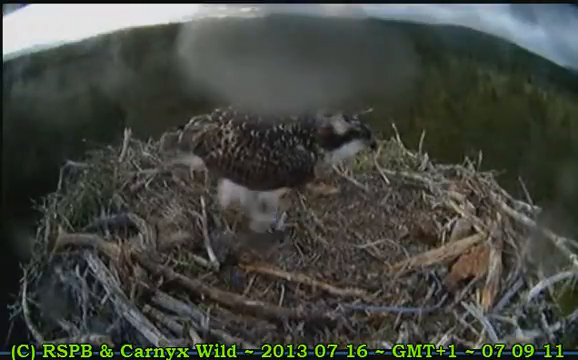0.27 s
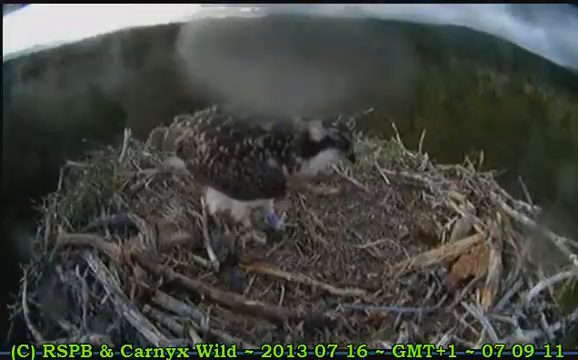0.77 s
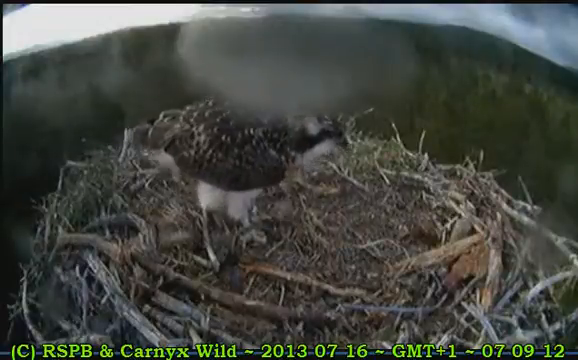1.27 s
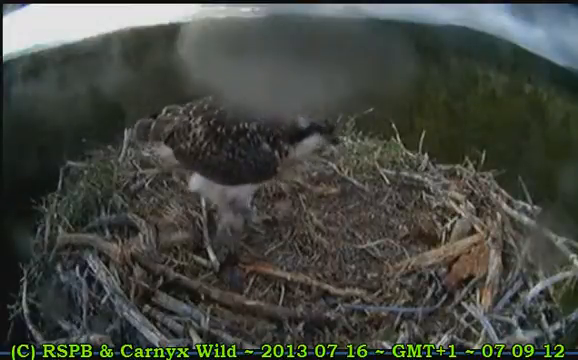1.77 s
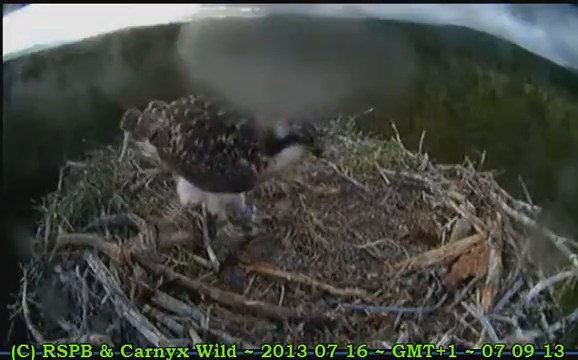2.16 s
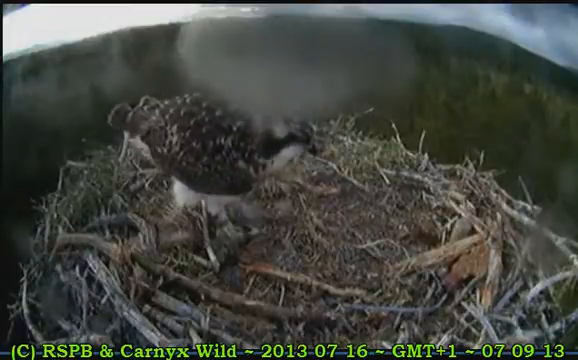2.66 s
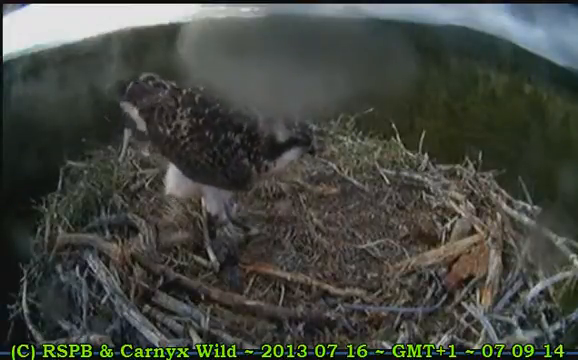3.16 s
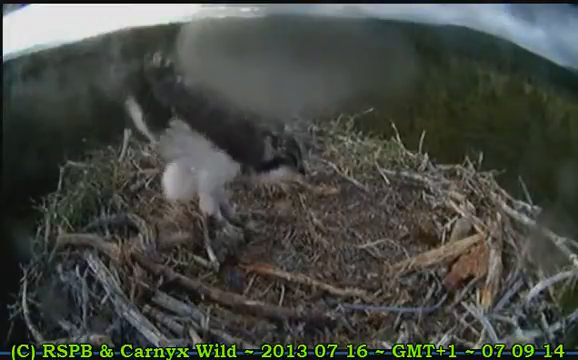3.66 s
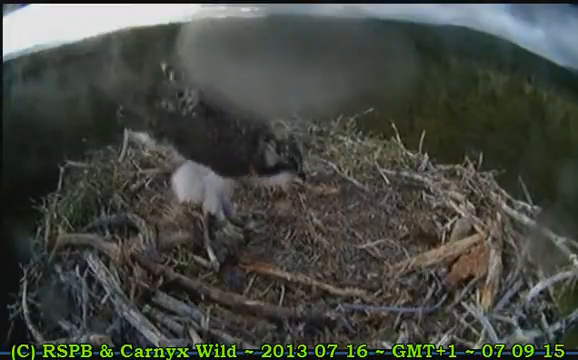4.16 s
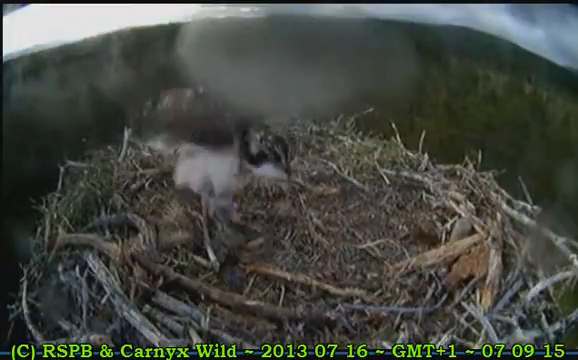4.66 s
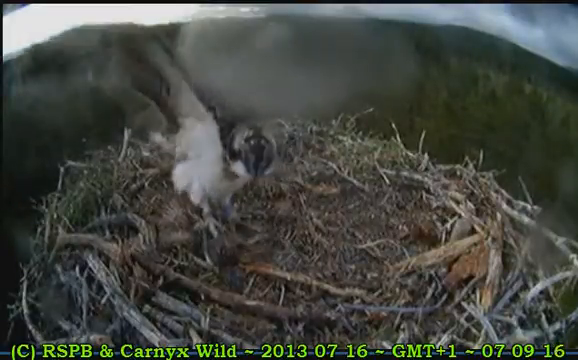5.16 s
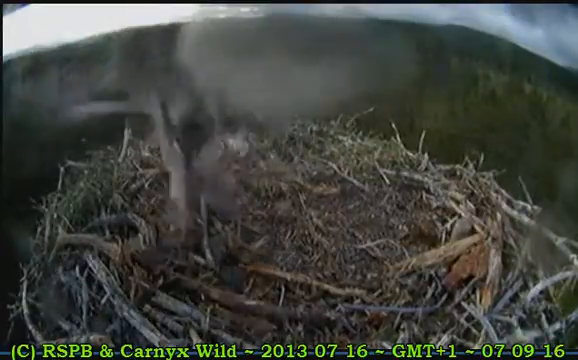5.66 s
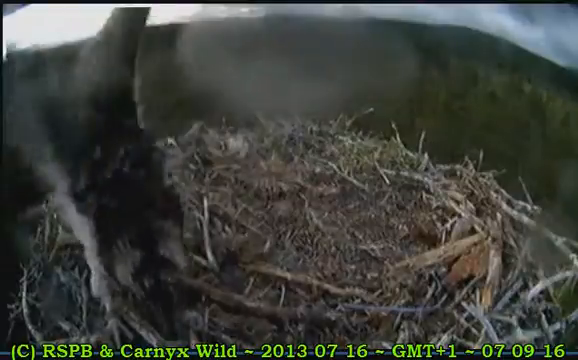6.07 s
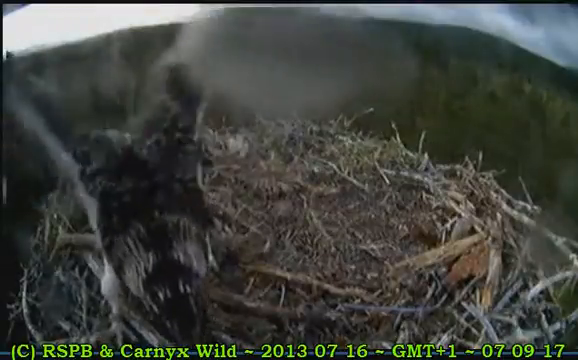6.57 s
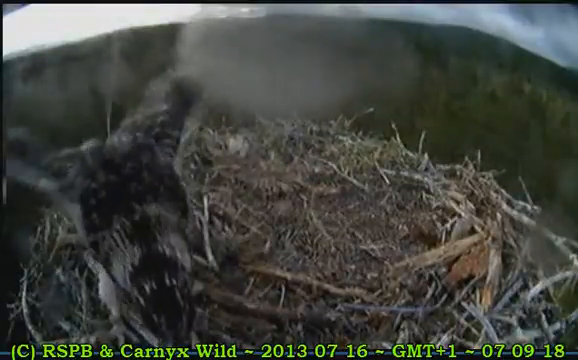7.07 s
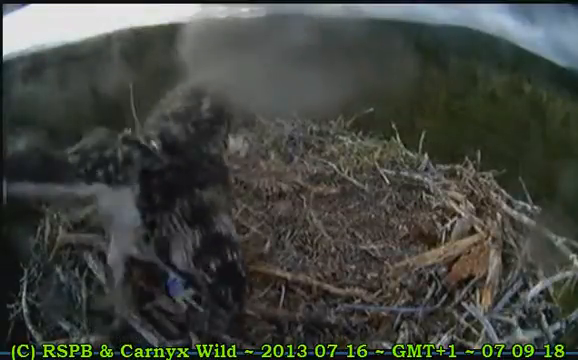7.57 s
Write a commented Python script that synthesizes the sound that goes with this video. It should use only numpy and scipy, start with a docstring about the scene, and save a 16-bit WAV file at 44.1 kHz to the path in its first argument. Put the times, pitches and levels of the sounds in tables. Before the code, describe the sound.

A young osprey shuffles and flaps on a stick nest amid buzzing mains hum and hiss, then gives one sharp, distorted, descending call.

```python
"""One loud, falling osprey call, a whistle with overtones and scattered breath, overloads both inputs. The
young bird sits on a stick nest: noise scrapes and sharp pushes ring resonances as rustles, snaps and thuds. A
faint rising tone follows the call, over gusting wind made of shaped stereo noise and over amplifier hiss. The
two microphone lines of an outdoor camera pick up mains hum, picture buzz and whistles, built from steady tones
that slip in time about twice a second."""
import sys
import numpy as np
from scipy import signal
from scipy.fft import rfft, irfft
from scipy.io import wavfile
from scipy.ndimage import uniform_filter1d, map_coordinates

SR = 44100
rng = np.random.default_rng(int(sys.argv[2]) if len(sys.argv) > 2 else 0)


def log_audio(samples):
    """Write samples as a 16-bit WAV file to the path given in sys.argv[1]."""
    # one column per channel
    frames = np.atleast_2d(samples).T
    # limit to full scale, then quantise
    limited = np.clip(frames, -1, 1)
    pcm = np.round(limited * 32767).astype(np.int16)
    wavfile.write(sys.argv[1], SR, pcm)


N = 344845
T = np.arange(N) / SR
CLOCK = np.arange(N + SR // 20) / SR  # runs on a little, so that the slips have something to skip to
SIDES = np.array([[.5], [-.5]])  # splits a left-minus-right difference over the two channels

# amplifier hiss colour: (frequency [Hz], relative density [dB per Hz])
HISS_COLOUR = [(600, 1.5), (1500, 1), (3000, 2), (6500, 3.5), (7350, 2.5), (7600, 6.5), (8300, 9),
               (8600, -26.5), (9700, -3), (10100, -15.5), (12200, -9.5), (14500, -6.5), (15700, -18)]
# likeness of the hiss on the two lines: (frequency [Hz], likeness [0-1])
HISS_ALIKE = [(1000, 0.89), (3000, 0.96), (7000, 0.95), (8000, 1.0), (9800, 1.0), (10300, 0.098)]
# phase lead of the left hiss: (frequency [Hz], lead [half turns])
HISS_LEAD = [(10000, 0), (10300, 1)]
# change in the hiss above 10 kHz: (time [s], level [dB])
HISS_TREBLE = [(0, -1), (5.8, -2), (6.1, 0), (7.2, 0.5), (7.5, 3), (7.82, 1)]
HISS_DB = -50
PATCHY_DB, PATCHY_PER_S = 2, 13.0  # each narrow band of the hiss flickers on its own

# mains hum: (multiple, left level [dB], right level [dB], left lead [rad])
MAINS_LINES = [(1, -44.5, -47.5, 1.87), (2, -88, -72, 3.9), (3, -40, -42.5, 0.92), (5, -45, -44, 1.12),
               (7, -56.5, -52, 0.54), (9, -67.5, -61, 0.64)]
# buzz of the picture fields: (multiple, left level [dB], right level [dB], left lead [rad])
FIELD_LINES = [(1, -58, -62, 2.5), (2, -53.5, -49, 1.7), (3, -50.5, -48, 1.26), (4, -58.5, -54.5, -2),
               (5, -56.5, -53, 0.53), (6, -64, -66, 0.5), (7, -58, -60.5, 0.97), (8, -56, -60, 0.45),
               (9, -66, -62.5, 0.86), (12, -63, -65.5, 4.5)]
# upper buzz lines, each moved to the nearest field multiple: (frequency [Hz], level [dB])
SPIKE_LINES = [(748.3, -76), (796.7, -67.5), (899.0, -65.5), (947.5, -70), (995.9, -68.5), (1044, -69.5),
               (1096, -76), (1146, -76), (1196, -76), (1296, -75), (1394, -69.5), (1497, -66), (1593, -74),
               (1642, -67.5), (1744, -69.5), (1994, -75), (2143, -69.5), (2245, -70.5), (2342, -73),
               (2492, -80), (2789, -69), (2939, -73), (3138, -72.5), (3240, -77), (3338, -76), (3738, -73),
               (3989, -73), (4086, -72), (4587, -71), (5184, -71)]
# whistles from the picture scan: (frequency [Hz], level [dB], share lost during blanking [0-1])
SCAN_WHISTLES = [(7975.08, -41.8, .85), (7838.0, -65, 0), (7738.3, -62, .3), (7688.4, -67, 0),
                 (5383.1, -59.5, .6), (2592.0, -62, .6)]
MAINS_HZ, FIELD_HZ = 49.803, 49.844
BLANK_S, SPIKE_S, CREST_S = .0119, .0188, -.0008  # time offsets of blanking, spike and mains crest
# stream samples skipped at each slip: one column (skip [samples])
SLIP_SAMPLES = [53, 52, 52, 52, 52, 53, 53, 52, 52, 52, 51, 51, 51, 54, 52]
SLIP_FIRST_S, SLIP_EVERY_S, STREAM_HZ = .49, .4985, 32000

# wind colour: (frequency [Hz], relative density [dB per Hz])
WIND_COLOUR = [(15, -23), (35, -14), (70, -9.5), (125, -6.5), (200, -4), (300, -8), (420, -10),
               (600, -14.5), (850, -20.5), (1500, -27), (2500, -45), (4000, -87)]
# likeness of the wind at the two microphones: (frequency [Hz], likeness [0-1])
WIND_LIKENESS = [(35, .4), (75, 0.2), (125, 0.8), (250, 0.36), (600, 0.93), (1200, 0.68)]
# phase lead of the left wind: (frequency [Hz], lead [rad])
WIND_PHASE = [(40, 3.0), (75, 2.9), (125, 2.2), (250, 1.9), (600, 2.45), (850, 2.3), (1200, 1.9),
              (2000, 1.2)]
# stereo balance of the wind: (frequency [Hz], left minus right [dB])
WIND_SIDES = [(40, -11), (75, 7.5), (125, 14.5), (200, 2.5), (300, 0.5), (500, -3.5), (1200, 0)]
# gusts, as the deep rumble before it flutters: (time [s], level [dB])
GUST_LEVEL = [(0, -51), (1.3, -48.5), (1.7, -52), (2.85, -52), (3.2, -48), (3.7, -52), (4.1, -55), (5, -53),
              (6.2, -51), (6.55, -57), (7.2, -55), (7.82, -55)]

# resonances of the rustling sticks: (frequency [Hz], width [Hz], relative level [dB])
STICK_MODES = [(1070, 390, 17.5), (1330, 670, 18), (2110, 930, 20.5), (2820, 440, -32.5)]
# resonances of the feathers: (frequency [Hz], width [Hz], relative level [dB])
FEATHER_MODES = [(3930, 740, 35), (4900, 900, -23), (6300, 1500, -37)]
# strokes of wings and feet: (peak [s], level [dB], swell [s], fade [s], feathers over sticks [dB])
NEST_STROKES = [(5.745, -41.5, 0.057, 0.044, -11), (5.785, -38, 0.051, 0.041, -5.5),
                (5.99, -45, 0.071, 0.023, -7), (6.025, -43, 0.047, 0.05, -2), (6.062, -44, 0.04, 0.025, 0),
                (6.3, -53.5, 0.49, 0.036, -7), (6.575, -53, 0.21, 0.051, 0), (6.78, -53, .02, 0.085, -4),
                (7.09, -53.5, 0.22, 0.2, -4.5), (7.285, -57, 0.014, 0.19, 3), (7.46, -49, 0.29, 0.1, -13),
                (7.62, -47, .1, 0.06, -5), (7.735, -53, 0.028, 0.1, -20)]
STROKE_DROP_DB, STROKE_BEND = 32, 2  # drop over one swell or fade, and its curvature
STROKE_PAN_DB, LUMPY_DB = -2.5, 1.5  # left minus right, and uneven level, of the whole rustle
SHUFFLE_FROM_S, SHUFFLE_DB = 5.1, -60  # light shuffling under the strokes

# modes of the heavy nest body: (frequency [Hz], width [Hz], relative level [dB])
NEST_MODES = [(100, 60, -15), (153, 110, 9), (222, 160, -8)]
# thuds of feet and wings, before the housing: (start [s], peak [dB], strongest [Hz], t60 of the push [s])
NEST_THUDS = [(5.75, -29.5, 214, 0.19), (5.99, -32, 99, 0.083), (7.568, -28.5, 150, 0.095)]
# modes of a thin twig: (frequency [Hz], width [Hz], relative level [dB])
TWIG_MODES = [(1440, 360, 10), (2230, 480, 7.5), (2750, 450, -7), (4680, 1100, -10)]
# snaps, before bass cut and housing: (start [s], peak [dB], brightest [Hz], left minus right [dB])
TWIG_SNAPS = [(3.566, -22, 1850, -6.5), (5.7277, -37, 1500, -2.5), (5.766, -27, 1200, -2.5),
              (5.783, -35, 2000, -2.5), (5.787, -28, 1400, -4), (5.846, -36, 1640, -5),
              (5.92, -33, 1410, -5), (5.939, -30, 1930, -2), (5.9787, -23.5, 2300, -5),
              (6.019, -35, 1500, -2.5), (6.028, -35, 1600, -2.5), (6.036, -35, 2200, -2.5),
              (6.0478, -24.5, 3000, -6), (6.13, -29, 2600, 0), (6.477, -35, 1480, -2),
              (6.562, -33, 3500, -2), (7.02, -36, 1600, -2), (7.077, -39, 3000, -2)]
SNAP_T60_S, SNAP_CRACK = 0.018, 16  # fade of the splintering; size of the first break over it
SECOND_CRACK_S, SECOND_CRACK = .0012, .6  # the twig breaks through later: delay, share of the first break

# faint rising after-note
AFTER_S, AFTER_HALF_S, AFTER_HZ, AFTER_HZ_PER_S, AFTER_DB = 7.426, .011, 1710, 11000, -31

# the call: (time [s], pitch [Hz], left level [dB], right level [dB], octave over whistle [dB])
CALL_PATH = [(7.3195, 2065, -40, -36, -16), (7.3235, 2068, -13.5, -10.5, -17), (7.333, 2012, -9, -5.8, -11),
             (7.339, 1950, -3, -.8, -11), (7.346, 1904, -.5, 2.2, -14), (7.356, 1889, 2.2, 4.8, -16),
             (7.367, 1880, 2.8, 6.2, -17), (7.381, 1782, 2.8, 5.8, -19), (7.388, 1728, 2, 3.6, -20),
             (7.392, 1685, -7, 0, -16), (7.396, 1625, -3, -8, -20), (7.399, 1530, -18, -14, -28),
             (7.404, 1495, -25, -22, -36), (7.409, 1490, -46, -40, -36)]
# upper overtones at full effort: (multiple, level over whistle [dB], extra left lead [rad])
CALL_OVERTONES = [(3, -27, 1.5), (4, -25, 0), (5, -32, 0), (7, -46, 0)]
WHISTLE_LEAD, OCTAVE_LEAD, OCTAVE_START = 1.15, .4, 1.5  # left leads [rad], twice; octave phase [rad]
SHIMMER_DB, SHIMMER_PER_S = .45, 900  # waver of the whole voice
OCTAVE_FLICKER_DB, OCTAVE_FLICKER_PER_S = 1.8, 300  # the octave wavers on its own
SCATTER_DB, SCATTER_T60_S = -31, .09  # breath among the sticks
TOP_HZ = 15750  # cut-off of the output


def undb(db):
    """Decibels to an amplitude factor."""
    return 10 ** (np.asarray(db) / 20)


def level(x, db):
    """Bring a sound to an RMS level."""
    return x * undb(db) / np.sqrt(np.mean(x ** 2))


def curve(rows):
    """Columns of a (time, ..) table at every sample."""
    s, *columns = np.transpose(rows)
    return [np.interp(T, s, c) for c in columns]


def over_hz(rows):
    """A (frequency, value) table at every spectral bin, joined along log frequency."""
    hz, value = np.transpose(rows)
    return np.interp(np.log(np.arange(N // 2 + 1) * SR / N + 1), np.log(hz), value)


def band(x, hz, width):
    """One resonance that passes a band around its pitch."""
    return signal.lfilter(*signal.iirpeak(hz, hz / width, SR), x)


def ring(x, modes):
    """A body sounds as the sum of its resonances."""
    return sum(undb(db) * band(x, hz, width) for hz, width, db in modes)


def highpass(x, order, hz):
    """Take away the bass."""
    return signal.sosfilt(signal.butter(order, hz, "high", fs=SR, output="sos"), x)


def lowpass(x, order, hz):
    """Take away the treble."""
    return signal.sosfilt(signal.butter(order, hz, fs=SR, output="sos"), x)


def walk(rate, size=N):
    """Random levels held 1 / rate s and slewed twice; spread near 1."""
    hold = int(SR / rate)
    steps = np.repeat(rng.standard_normal(size // hold + 1), hold)
    return 1.3 * uniform_filter1d(uniform_filter1d(steps, hold), hold)[:size]


def stereo_noise(shape_db, alike, lead):
    """Stereo noise of a given colour, likeness and phase lead of the left channel."""
    left, other = rfft(rng.standard_normal((2, N)))
    alike = np.clip(alike, 0, 1)
    right = alike * left * np.exp(-1j * lead) + np.sqrt(1 - alike ** 2) * other
    return level(irfft(undb(shape_db) * np.array([left, right]), N), 0)


def harmonics(rows, turns, start):
    """Multiples of a cycle whose crests line up, as a short pulse makes them, apart from the given phases."""
    out = 0
    for k, left_db, right_db, lead in rows:
        phase = 2 * np.pi * k * turns + start(k) - np.array([[0], [lead]])
        out = out + np.sqrt(2) * undb([[left_db], [right_db]]) * np.cos(phase)
    return out


def hiss():
    """Amplifier hiss: shared by both lines up to the whistles, mostly each line's own and opposed above."""
    noise = stereo_noise(over_hz(HISS_COLOUR), over_hz(HISS_ALIKE), np.pi * over_hz(HISS_LEAD))
    flicker = 0
    for hz in 1500 * 1.15 ** np.arange(12):
        change = undb(PATCHY_DB * walk(PATCHY_PER_S)) - 1
        flicker = flicker + change * band(noise, hz, hz / 9)
    noise = noise + flicker
    top = signal.sosfiltfilt(signal.butter(4, 10000, "high", fs=SR, output="sos"), noise)
    return undb(HISS_DB) * (noise + (undb(curve(HISS_TREBLE)[0]) - 1) * top)


def mains_hum():
    """Charging pulses of alternate sign; the coupling capacitor advances the lowest multiples."""
    return harmonics(MAINS_LINES, MAINS_HZ * (CLOCK - CREST_S), lambda k: .2 + 1.8 / k ** 3)


def field_buzz():
    """Low multiples of the picture field rate, which beat slowly against the mains."""
    return harmonics(FIELD_LINES, FIELD_HZ * (CLOCK - BLANK_S), lambda k: 0)


def field_spike():
    """A short ragged burst once a field, whose lines only roughly line up."""
    spread = 0.47 * rng.standard_normal(len(SPIKE_LINES))  # rad
    cycle = np.linspace(0, 1, 8192)
    burst = 0
    for (hz, db), offset in zip(SPIKE_LINES, spread):
        burst = burst + undb(db) * np.cos(2 * np.pi * round(hz / FIELD_HZ) * cycle + offset)
    spikes = np.interp(FIELD_HZ * (CLOCK - SPIKE_S) % 1, cycle, burst)
    return np.sqrt(2) * undb(.8 * walk(9, size=len(CLOCK))) * spikes


def scan_whistles():
    """Steady tones of the picture scan, some of which dip at the blanking once a field."""
    turns = FIELD_HZ * (CLOCK - BLANK_S)
    blank = np.exp(-(((turns + .5) % 1 - .5) / 0.05) ** 2)
    tones = 0
    for hz, db, lost in SCAN_WHISTLES:
        tones = tones + undb(db) * (1 - lost * blank) * np.sin(2 * np.pi * hz * CLOCK)
    return np.sqrt(2) * undb(.6 * walk(9, size=len(CLOCK))) * tones


def slip(x):
    """The stream skips ahead to keep time, with a brief cross-fade; steady tones jump in phase."""
    count = (T - SLIP_FIRST_S) / SLIP_EVERY_S + 1
    before = count.astype(int)
    ahead = np.cumsum([0, 0] + SLIP_SAMPLES) * SR / STREAM_HZ

    def read(k):
        return np.array([map_coordinates(line, [np.arange(N) + ahead[k]], mode="mirror") for line in x])

    fade = np.clip(count % 1 * SLIP_EVERY_S / .0015, 0, 1)  # over 1.5 ms
    return fade * read(before + 1) + (1 - fade) * read(before)


def wind():
    """Low rumble that gusts and flutters, reaching the two microphones with a phase shift."""
    air = stereo_noise(over_hz(WIND_COLOUR), over_hz(WIND_LIKENESS), over_hz(WIND_PHASE))
    air = irfft(rfft(air) * undb(SIDES * over_hz(WIND_SIDES)), N)
    # the gust level is that of the deep rumble
    air = air / np.std(band(air.mean(axis=0), 95, 80))
    low = lowpass(air, 2, 250)
    fluttering = low * undb(1.5 * walk(9.7)) + (air - low) * undb(1.2 * walk(14.0))
    return undb(curve(GUST_LEVEL)[0]) * fluttering


def rustle():
    """Dense scrapes of uneven size ring the sticks and the feathers; each stroke swells, peaks and fades."""
    hits = rng.random((2, N)) < 3500 / SR  # about 3500 per second on each side
    scrapes = hits * rng.standard_normal((2, N)) * undb(1.3 * rng.exponential(size=(2, N)))
    scrapes = scrapes + 0.5 * scrapes[::-1]  # each side leaks into the other

    def texture(modes, hz):
        return level(band(ring(scrapes, modes), hz, 2 * hz / 3), 0)

    sticks, feathers = texture(STICK_MODES, 1600), texture(FEATHER_MODES, 4200)
    shuffle_in = np.clip((T - SHUFFLE_FROM_S) / 0.11, 0, 1)
    out = undb(SHUFFLE_DB) * shuffle_in * (sticks + undb(-0.5) * feathers)
    for s, db, swell_s, fade_s, treble_db in NEST_STROKES:
        away = np.where(T < s, (s - T) / swell_s, (T - s) / fade_s)
        stroke = undb(db - STROKE_DROP_DB * away ** STROKE_BEND)
        out = out + stroke * (sticks + undb(treble_db) * feathers)
    return out * undb(SIDES * STROKE_PAN_DB + LUMPY_DB * walk(90))


def blow(s, db, hz, t60, modes, rise_s, crack):
    """A short ragged push, with a clean crack if any, rings the modes of a body, most strongly near hz."""
    t = np.arange(int(.15 * SR)) / SR
    push = np.exp(-np.log(1000) * t / t60) * np.minimum(t / rise_s, 1) * rng.standard_normal(len(t))
    push[int(rise_s * SR)] += crack
    push[int((rise_s + SECOND_CRACK_S) * SR)] -= crack * SECOND_CRACK
    sound = band(band(ring(push, modes), hz, 1.5 * hz), hz, 1.5 * hz)
    start = int(s * SR)
    return np.pad(undb(db) * sound / np.abs(sound).max(), ((0, 0), (start, N - start - len(t))))


def thuds():
    """Soft pushes of feet and wings ring the heavy nest, equally loud on both sides."""
    return sum(blow(s, db + 0 * SIDES, hz, t60, NEST_MODES, 0.013, crack=0) for s, db, hz, t60 in NEST_THUDS)


def snaps():
    """Twigs crack twice in quick succession and splinter; thin twigs have no bass."""
    out = 0
    for s, db, hz, pan_db in TWIG_SNAPS:
        out = out + blow(s, db + SIDES * pan_db, hz, SNAP_T60_S, TWIG_MODES, 0.00062, crack=SNAP_CRACK)
    return highpass(out, 3, 900)


def after_note():
    """A faint rising tone that reaches the two microphones in opposite phase."""
    t = T - AFTER_S
    swell = np.exp(-(t / AFTER_HALF_S) ** 4)
    peep = swell * np.sin(2 * np.pi * (AFTER_HZ + AFTER_HZ_PER_S * t / 2) * t)
    return undb(AFTER_DB) * 2 * SIDES * peep


def call():
    """A falling whistle with its overtones and a breathy edge that scatters briefly among the sticks."""
    hz, left_db, right_db, octave_db = curve(CALL_PATH)
    turned = 2 * np.pi * np.cumsum(hz) / SR
    phase = turned - np.array([[0], [WHISTLE_LEAD]])
    sounding = (T > CALL_PATH[0][0]) & (T < CALL_PATH[-1][0])
    effort = undb([left_db, right_db] + SHIMMER_DB * walk(SHIMMER_PER_S)) * sounding
    octave_level = undb(octave_db + OCTAVE_FLICKER_DB * walk(OCTAVE_FLICKER_PER_S))
    octave = octave_level * np.sin(2 * turned + OCTAVE_START - np.array([[0], [OCTAVE_LEAD]]))
    overtones = 0
    for k, db, lead in CALL_OVERTONES:
        overtones = overtones + undb(db) * np.sin(k * phase + np.array([[lead], [0]]))
    # upper overtones grow with effort
    voice = np.sin(phase) - octave + np.minimum(effort, 1) ** 2 * overtones
    keep = np.exp(-np.log(1000) / (SCATTER_T60_S * SR))  # share left after one sample
    lingering = signal.lfilter([1 - keep], [1, -keep], effort)
    breath = band(rng.standard_normal((2, N)), 2400, 22000) * lingering
    return voice * effort + undb(SCATTER_DB) * breath


def scene():
    """Only the electrical tones slip; the microphone housing dulls the nest sounds above a few kHz."""
    pickup = slip(mains_hum() + field_buzz() + field_spike() + scan_whistles())
    nest = lowpass(rustle() + snaps() + thuds(), 6, 6500)
    return hiss() + pickup + wind() + nest + after_note() + call()


def record(dry):
    """The input stage rounds off at its rails and flips back up when driven far below; then coupling and cut-off."""
    rounded = dry / (1 + np.abs(dry) ** 9) ** (1 / 9)
    flipped = rounded + .95 * np.clip((-dry - 1.68) / .12, 0, 1)
    coupled = highpass(flipped, 1, 5)
    limited = np.clip(coupled, -.97, .97)
    return signal.sosfilt(signal.ellip(8, .2, 80, TOP_HZ, fs=SR, output="sos"), limited)


dry = scene()
out = record(dry)
log_audio(out)
```